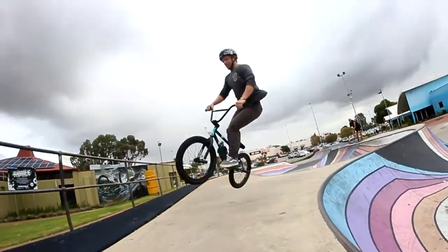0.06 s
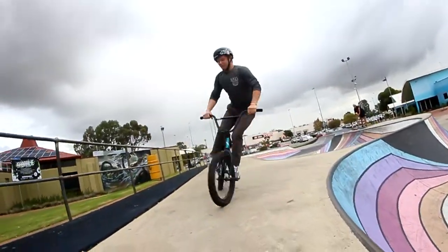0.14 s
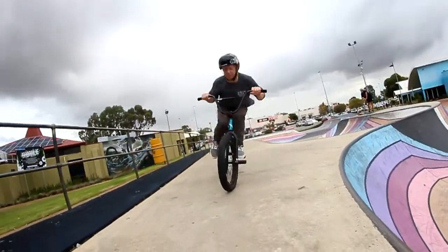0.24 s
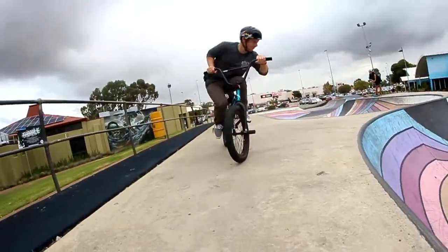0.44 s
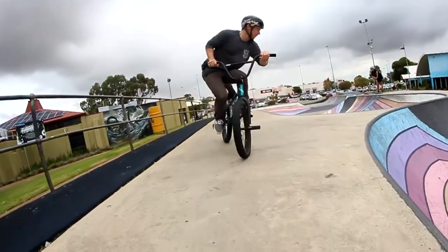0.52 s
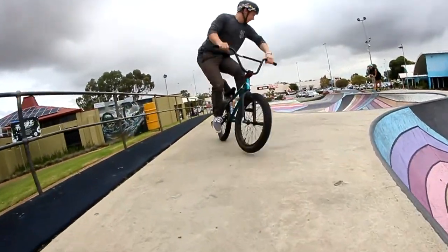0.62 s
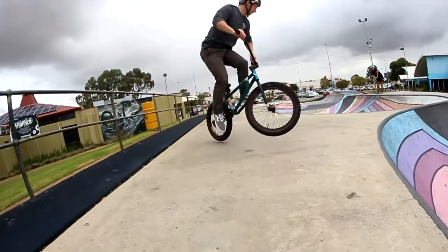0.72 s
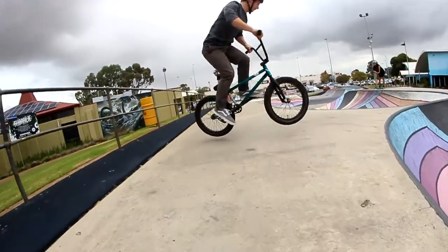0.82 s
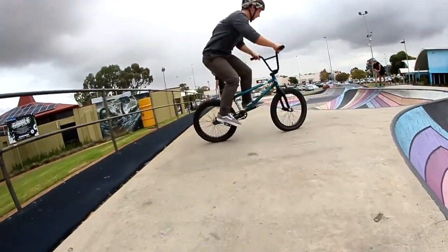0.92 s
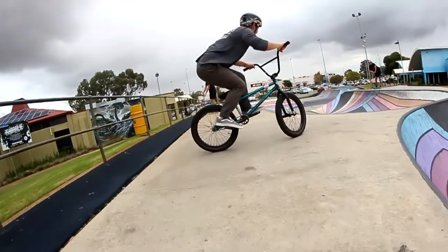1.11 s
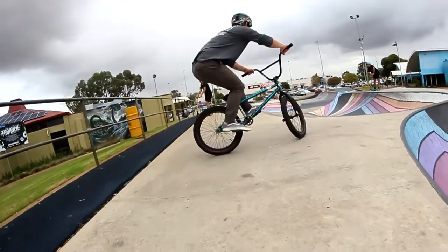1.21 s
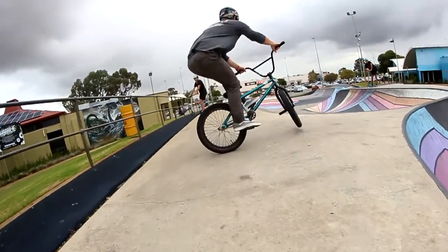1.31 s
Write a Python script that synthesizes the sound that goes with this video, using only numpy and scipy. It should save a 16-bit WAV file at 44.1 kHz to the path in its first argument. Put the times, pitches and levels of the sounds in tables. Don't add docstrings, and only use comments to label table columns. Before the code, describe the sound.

A bicycle tyre slap dominates: a fast freewheel buzz slows over the first 0.2 s, then at 0.21 s the tyre smacks concrete sharply with a tiny squeak, rubber drag and short scatter from ramps. Quiet chain ticks, frame pings and dull bumps follow. Two softer touches land at 0.93 and 0.97 s, with a chirp near 1.03; ratchet clicks quicken from 1.2 s. Faint wind, traffic and motor hum underneath.

```python
import sys
import numpy as np
from scipy import signal
from scipy.fft import rfft, irfft
from scipy.io import wavfile
from scipy.ndimage import uniform_filter1d

SR = 44100
rng = np.random.default_rng(int(sys.argv[2]) if len(sys.argv) > 2 else 0)


def invert_db(level):
    return 10 ** (np.asarray(level, dtype=float) / 20)


def wav_record(signal):
    frames = np.transpose(np.atleast_2d(signal))
    bounded = np.clip(frames, -1, 1)
    quanta = np.round(bounded * 32767).astype(np.int16)
    wavfile.write(sys.argv[1], SR, quanta)


N = 59535


def evened(x):
    return x / np.sqrt(np.mean(x ** 2) + 1e-20)


def smoothed(x, size):
    return uniform_filter1d(uniform_filter1d(x, size), size)


def read(points, hz):
    f, value = np.transpose(points)
    return np.interp(np.log(hz + 1), np.log(f + 1), value)


def curve(points):
    return invert_db(np.interp(np.arange(N) / SR, *np.transpose(points)))


def add(mix, s, sound):
    at = round(s * SR)
    sound = sound[max(-at, 0):]
    part = mix[max(at, 0):][:len(sound)]
    part += sound[:len(part)]


def coloured(points, size=N):
    hz = np.fft.rfftfreq(size, 1 / SR)
    gain = invert_db(read(points, hz)) * np.minimum(hz / points[0][0], 1) ** 2
    return evened(irfft(rfft(rng.standard_normal(size)) * gain, size))


def resonate(x, hz, width):
    turn = np.exp(2j * np.pi * hz * np.arange(len(x)) / SR)
    r = np.exp(-np.pi * width / SR)
    return 2 * (turn * signal.lfilter([1 - r], [1, -r], x / turn)).real


def shape(t, rise, hold, t60):
    return np.minimum(t / rise, 1) * invert_db(-60 * np.maximum(t - hold, 0) / t60)


def ring(modes, t, cycles):
    out = 0
    for hz, db, t60 in modes:
        swell = np.minimum(t * hz / cycles, 1)
        out = out + invert_db(db - 60 * t / t60) * np.sin(2 * np.pi * hz * t) * swell
    return out


# time in seconds, tooth count.
SLOWING = [(-.0025, 0), (.0538, 8), (.076, 11), (.111, 15), (.1196, 16), (.1441, 18), (.193, 21)]
RISING = [(1.1918, 0), (1.218, 1), (1.2345, 2), (1.2472, 3), (1.2691, 5), (1.328, 11), (1.352, 13)]
# time in seconds, level in dB.
PAWL_FORCE = [(0, -49), (.055, -49.5), (.11, -52), (.2, -59.5), (1.19, -56.5), (1.235, -48.5), (1.3, -51.5),
              (1.35, -49)]
# frequency in Hz, level in dB per Hz.
HUB = [(590, -53.5), (1000, -21.5), (1220, -23.5), (2310, 4), (2780, -8), (3460, -1), (5440, -11),
       (10900, -6), (16000, -9)]
HUM = [(1000, -18), (2200, -4), (4300, -6), (5500, -16), (16000, -16)]
# lowest pitch in Hz, highest pitch in Hz, level in dB.
PAWL_NOTES = [(1900, 3000, 0.5), (3000, 4400, 3.5), (8500, 12500, 2.5)]
# pitch in Hz, width in Hz, level in dB.
SHELL = [(2120, 120, -7.5), (3728, 690, -7), (7470, 510, -15), (11300, 1400, -13)]


def ratchet():
    spread_db, hold_s = 1.5, .0018
    gate, hum, notes = np.zeros((3, N))
    t = np.arange(3000) / SR
    for spell in (SLOWING, RISING):
        s, teeth = np.transpose(spell)
        for at in np.interp(np.arange(teeth[-1] + 1), teeth, s):
            force = invert_db(spread_db * rng.standard_normal())
            add(gate, at, force * shape(t, rise=.0006, hold=hold_s, t60=.017))
            add(hum, at, force * invert_db(-5 - 60 * t / 0.071))
            for low, high, db in PAWL_NOTES:
                place, late, weak = rng.random(3)
                t60 = 0.023 * (2500 / high) ** .5
                note = (low + (high - low) * place, db - 9.5 * weak, t60)
                add(notes, at + late * hold_s, ring([note], t, cycles=3.1))
    force = curve(PAWL_FORCE)
    rattle = (coloured(HUB) * gate + coloured(HUM) * hum) * force
    shell = sum(invert_db(db + 0.5) * resonate(rattle, hz, width) for hz, width, db in SHELL)
    return notes * force + invert_db(-1.5) * rattle + shell


# frequency in Hz, level in dB per Hz.
AIR = [(15, -35.5), (25, -3), (161, -11.5), (775, -23), (1520, -30), (2550, -46), (4030, -32), (4870, -47),
       (16000, -41.5)]
ROLL = [(180, -31), (300, -16), (470, -15), (900, 0), (1140, -4), (1560, 0), (4500, -10), (5600, -17.5),
        (16000, -24.5)]
GUST_COLOUR = [(25, -15), (50, -6.5), (100, 11), (150, 6), (300, -8), (600, -46)]
# time in seconds, level in dB.
LOAD = [(0, -66), (.2, -64.5), (.35, -62.5), (.45, -68), (.56, -69), (.64, -61.5), (.73, -62.5),
        (.78, -72.5), (.9, -72.5), (.96, -65.5), (1.05, -70), (1.12, -70.5), (1.2, -64), (1.35, -60)]
GUST = [(0, -56.5), (.4, -64.5), (.58, -59.5), (.87, -53.5), (1.15, -58), (1.35, -70)]


def background():
    lumps = evened(smoothed(rng.standard_normal(N), 900))
    wind = coloured(GUST_COLOUR) * curve(GUST) * invert_db(1.5 * lumps)
    traffic = invert_db(-53.5 - 5.5) * coloured(AIR)
    return traffic + curve(LOAD) * coloured(ROLL) + wind


def drone():
    note = evened(resonate(rng.standard_normal(N), hz=396.1, width=6))
    return invert_db(-68) * note * shape(np.arange(N) / SR, rise=.001, hold=0.62, t60=1.5)


# snap time in seconds, then snap, scuff, thud and tail levels in dB.
LANDINGS = [
    (.2106, -5.5, -30, -25, -41),
    (.9333, -30.5, -51.5, -43.5, -51.5),
    (.972, -18.5, -40.5, -34.5, -50),
]
# pitch in Hz, level in dB, t60 in seconds.
TYRE = [(260, -1, 0.056), (355, -11.5, 0.16), (416, 3.5, 0.036), (636, 5, 0.029), (766, -0.5, 0.035),
        (1337, -10.5, 0.026)]
LIGHT_TYRE = [(254, 4, 0.022), (434, 6.5, 0.018), (880, -13, 0.014), (1260, -8, 0.019)]
# frequency in Hz, level in dB per Hz.
SCUFF = [(1200, 3), (2600, -7.5), (4000, 0.5), (6000, -7.5), (16000, -15)]
SCATTER = [(59, -38), (100, 1), (358, -0.5), (502, -9.5), (1680, -10), (2520, -11.5), (6020, -18),
           (7770, -24), (16000, -28.5)]
# frequency in Hz, t60 in seconds.
SCATTER_T60 = [(100, 0.55), (1000, 0.6), (2500, 0.31), (6000, 0.39), (12000, 0.31)]


def landing(s, snap_db, scuff_db, thud_db, tail_db):
    size, touch_s = 20000, 0.0019
    t, out = np.arange(size) / SR, np.zeros(size)
    touch = coloured(SCATTER, size=4096) * shape(t[:4096], rise=0.00042, hold=touch_s, t60=.004)
    add(out, 0, invert_db(2 * thud_db + 18.5) * touch)

    u = t / (.000015 * invert_db(-.3 * snap_db))
    v = t / .0005
    rebound = invert_db(-24) * v * (1 - v / 2) * np.exp(1 - v)
    blow = invert_db(snap_db) * (u * np.exp(1 - u) - rebound)
    hard = thud_db > -30
    if not hard:
        blow = -blow
    blow = blow + invert_db(thud_db) * ring(TYRE if hard else LIGHT_TYRE, t, cycles=0.89)
    blow += invert_db(scuff_db) * coloured(SCUFF, size=size) * shape(t, rise=0.00059, hold=0.0047, t60=.008)

    hz, frames, z = signal.stft(coloured(SCATTER, size=size), SR, nperseg=256)
    decay = invert_db(-60 * frames / read(SCATTER_T60, hz)[:, None])
    tail = signal.istft(z * decay, SR, nperseg=256)[1][:size]
    add(out, touch_s, blow + invert_db(tail_db) * tail * np.minimum(t / 0.0044, 1))
    return s - touch_s, out


# start in seconds, length in seconds, level in dB, pitch in Hz,
# roughness from 0 to 1.
SQUEAKS = [
    (.2109, 0.0047, -13.5, 5916, 0.63),
    (.217, .0055, -42, 5800, .9),
    (.227, .0025, -48, 6300, .4),
    (.332, .004, -55, 4990, .1),
    (.284, 0.0067, -53.5, 6660, 0),
    (1.018, 0.009, -62, 5240, 0),
    (1.0262, 0.0045, -48, 5150, 0.2),
]
# multiple of the pitch, level in dB.
OVERTONES = [(1, -3.5), (1.5, -25.5), (2, -10.5), (3, -21)]
# frequency in Hz, level in dB.
CHATTER = [(2500, -30.5), (4100, 3.5), (4650, -5), (5300, 3.5), (6300, -1), (8500, -9), (11500, -2),
           (15000, -10.5)]


def squeak(s, length, db, hz, rough):
    t = np.arange(round(length * SR) + 40) / SR
    waver, throb = (evened(smoothed(v, 16))[:len(t)] for v in rng.standard_normal((2, 2000)))
    lift = 0.17 * rough * (t / t[-1]) ** 4
    turns = np.cumsum(hz * (1 + .05 * rough * waver + lift)) / SR
    smooth_db = -11.5 * max(1 - 2 * rough, 0)
    tone = sum(invert_db(d + (k > 1) * smooth_db) * np.sin(2 * np.pi * k * turns) for k, d in OVERTONES)
    edge = np.clip(np.minimum(t, t[-1] - t) / (0.078 * length + 0.00024), 0, 1)
    chatter = rough * invert_db(1 - 8 * t / t[-1]) * coloured(CHATTER, size=2000)[:len(t)]
    return s, invert_db(db) * (invert_db(3 * rough * throb) * np.sqrt(2) * tone + chatter) * edge


# start in seconds, level in dB, pitch in Hz, length in seconds.
BUMPS = [(.212, -30, 125.4, 0.018), (.465, -50, 84, 0.0083), (.67, -49, 92.3, 0.03),
         (.715, -42, 74.4, 0.0077), (.81, -47.5, 124.5, 0.021), (.86, -46, 58, 0.016),
         (.978, -42, 95.2, 0.029), (1.03, -50, 120.6, 0.032), (.232, -50, 373, 0.024),
         (.272, -42.5, 295, 0.0062), (.662, -58, 282.6, 0.032), (.982, -40, 166, .01),
         (.952, -51, 130, 0.0073), (1.115, -64.5, 498, 0.027)]


def bump(s, db, hz, length):
    t = np.arange(6000) / SR
    return s, invert_db(db) * np.sin(2 * np.pi * hz * t) * shape(t, rise=.006, hold=length, t60=.05)


# start in seconds, level in dB, length in seconds.
SKIDS = [
    (.2165, -50.5, 0.1),
    (.936, -51.5, 0.0075),
    (.978, -58, 0.085),
]
# frequency in Hz, level in dB.
RATTLE = [(800, 1), (2000, 8), (5000, -6.5), (10000, -22), (16000, -10)]


def skid(s, db, length):
    t = np.arange(8000) / SR
    hiss = coloured(RATTLE, size=8000) * shape(t, rise=0.0013, hold=length, t60=0.028)
    return s, invert_db(db - 87 * t) * hiss


# start in seconds, level in dB, pitch in Hz, t60 in seconds.
PINGS = [(.3052, -48, 2035, .1), (.305, -51, 1560, .05), (.321, -53, 2035, .06), (.218, -43, 2050, .03),
         (.6608, -44, 2080, .04), (.6612, -51, 1750, .025), (.661, -55, 3540, .04), (.676, -55, 2000, .05),
         (.7132, -49, 3050, .022), (.7134, -50, 2050, .025), (.718, -57, 2000, .03), (.725, -57, 1500, .03),
         (.251, -47, 700, .04), (.33, -54, 2900, .025), (.306, -57, 3400, .07), (.4394, -58, 4100, .03),
         (.5471, -59, 2080, .03), (.8624, -64, 4100, .025), (.972, -36, 1250, .015),
         (.9335, -42, 950, .015)]


def ping(s, db, hz, t60):
    return s, ring([(hz, db, t60)], np.arange(6000) / SR, cycles=1.5)


# start in
# seconds, level in dB, pitch in Hz, length in seconds, # slope of the puff in dB per octave.
TICKS = [(.238, -53.5, 5500, 0.007, -8), (.269, -63, 10700, 0.0022, -3), (.3296, -58, 3630, 0.0039, -18),
         (.365, -70, 12900, .0016, -9), (.381, -72.5, 12100, .001, -9), (.4114, -67, 5160, 0.0044, -19),
         (.4394, -64.5, 3940, 0.0027, -8), (.449, -64, 2050, 0.0028, -8), (.4853, -65, 6000, .002, -2),
         (.492, -73.5, 11000, .004, -6), (.499, -67.5, 4960, .003, -9), (.522, -74, 8000, .003, -2),
         (.5471, -67, 2080, 0.0045, -7), (.636, -72, 9000, .004, -3), (.6608, -62, 2390, .006, -9.5),
         (.7132, -60, 2780, 0.0028, -9.5), (.726, -65, 1900, 0.0091, -9), (.8624, -69.5, 4000, .004, -11.5),
         (1.0055, -54, 4900, .0015, -3), (1.015, -60, 15000, 0.015, -6), (1.106, -74, 9000, 0.0022, -6),
         (1.118, -68, 12140, .001, -2), (1.1348, -72.5, 8930, .004, -5), (1.197, -68, 3000, .004, -6),
         (.574, -72.5, 8500, 0.0043, -3), (.602, -72.5, 10500, 0.017, 3), (1.2145, -76, 8000, .001, -3),
         (1.18, -73, 8000, .001, -8)]


def tick(s, db, hz, length, slope_db):
    size, t60 = 2000, .02
    t = np.arange(size) / SR
    colour = [(hz / 4, 2 * slope_db), (hz, 0), (hz * 8, 3 * slope_db)]
    puff = coloured(colour, size=size) * shape(t, .0003, length, t60)
    note = evened(resonate(rng.standard_normal(size), hz, width=hz / 5)) * shape(t, .0004, length, t60)
    return s, invert_db(db) * (invert_db(2) * puff + note)


# start in seconds, level in dB, width in seconds.
FOLDS = [
    (.9353, -29.5, 0.00024),
    (0.98, -31.5, 0.00029),
    (0.94, -49, .0006),
]


def fold(s, db, width):
    t = np.arange(200) / SR
    return s, -invert_db(db) * np.exp(-(t / width - 1.5) ** 2)


# start in seconds, level in dB, tilt of the high notes in dB per decade.
KNOCKS = [
    (1.0375, -51, -4),
]
# pitch in Hz, level in dB, t60 in seconds.
FRAME = [(1750, -6, .07), (2035, -6, .13), (2654, -6, .14), (3420, -3, .12), (5140, -7, .14),
         (8270, -16, .12), (10280, -14, .1)]


def knock(s, db, high_db):
    modes = [(hz, d + high_db * np.log10(hz / 2000), t60) for hz, d, t60 in FRAME]
    return s, invert_db(db) * ring(modes, np.arange(9000) / SR, cycles=1.2)


def scene():
    mix = ratchet() + background() + drone()
    for rows, source in ((LANDINGS, landing), (SQUEAKS, squeak), (BUMPS, bump), (SKIDS, skid),
                         (PINGS, ping), (TICKS, tick), (FOLDS, fold), (KNOCKS, knock)):
        for row in rows:
            add(mix, *source(*row))
    return mix[None]


def band_limit(x):
    return signal.sosfilt(signal.butter(12, 16400, fs=SR, output="sos"), x)


def record(dry):
    treble_cut = signal.firwin(255, 15800, window=("kaiser", 6), fs=SR)
    limited = signal.oaconvolve(dry, treble_cut[None], "same")
    bass_cut = signal.butter(2, 40, "high", fs=SR, output="sos")
    return band_limit(signal.sosfilt(bass_cut, limited))


dry = scene()
out = record(dry)
wav_record(out)
```